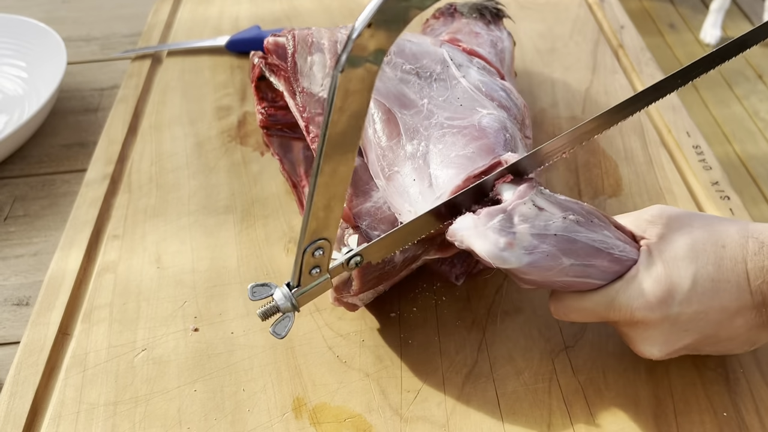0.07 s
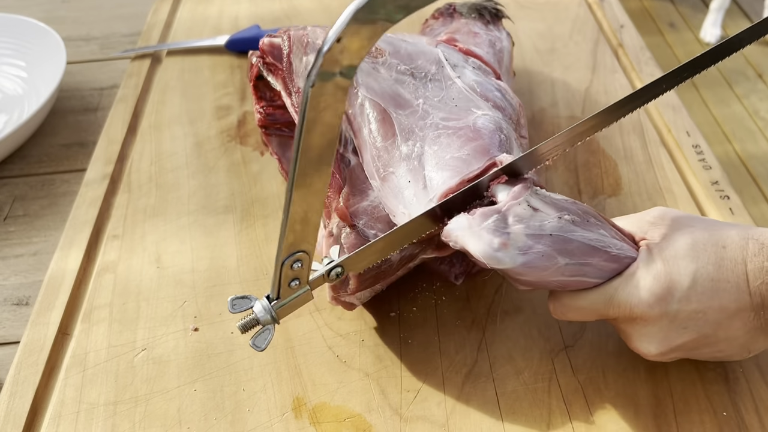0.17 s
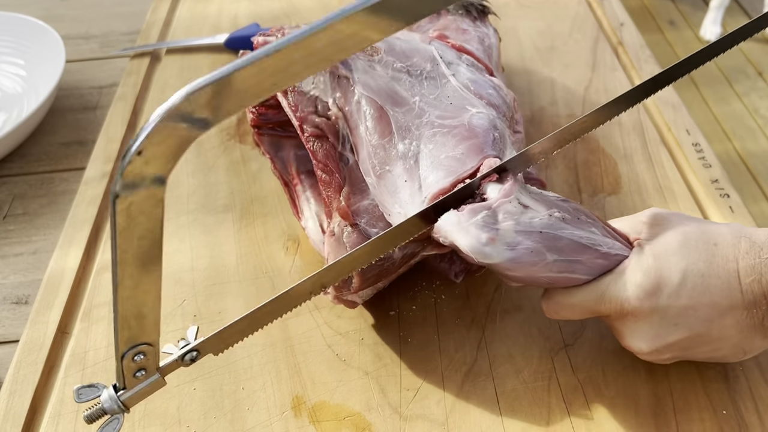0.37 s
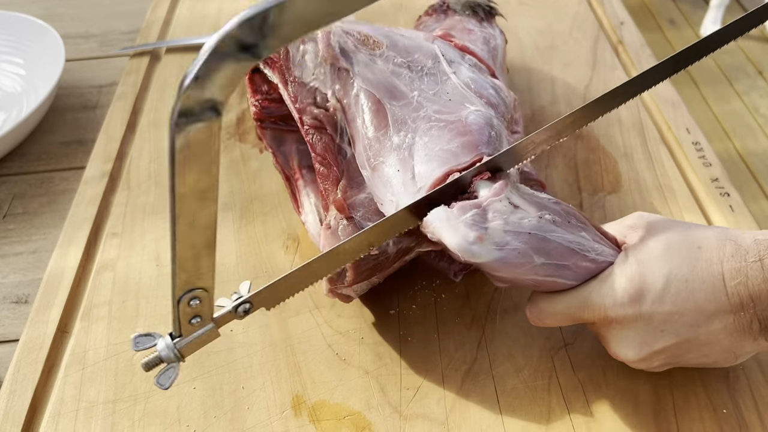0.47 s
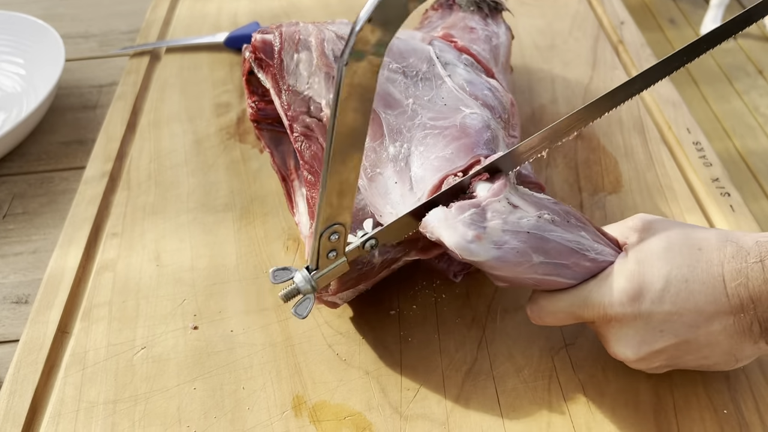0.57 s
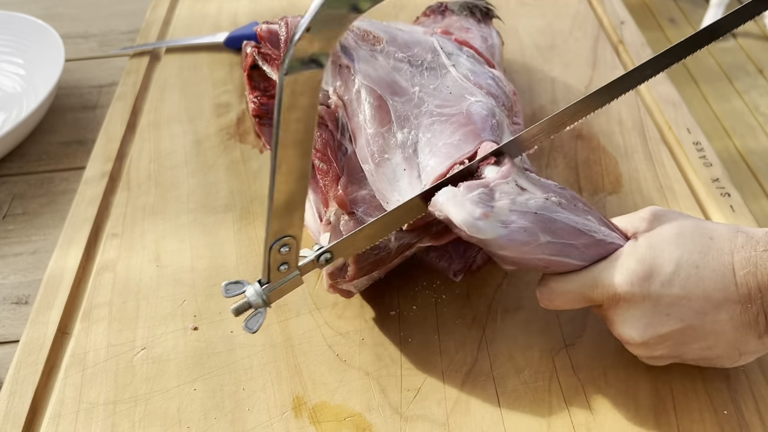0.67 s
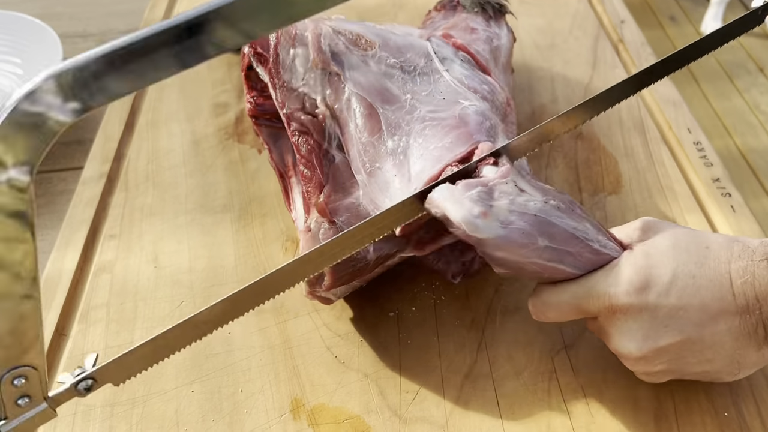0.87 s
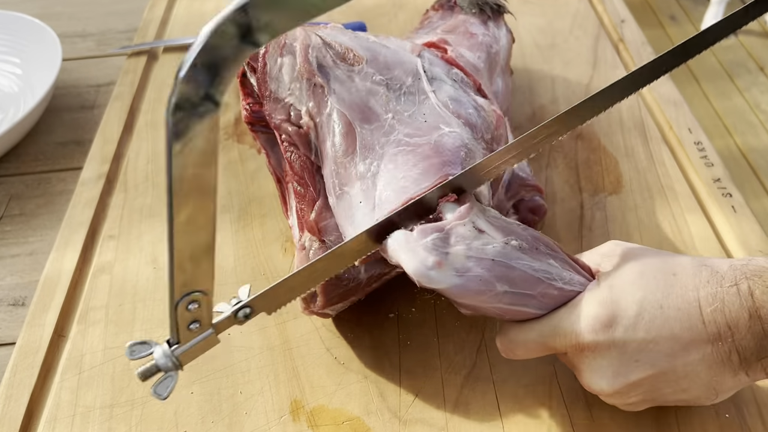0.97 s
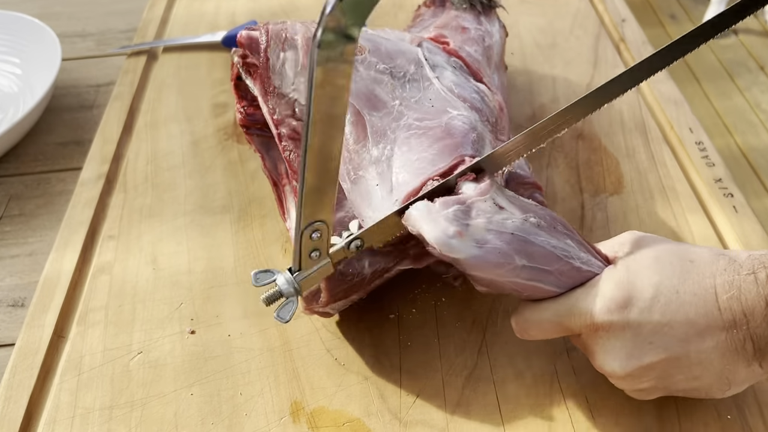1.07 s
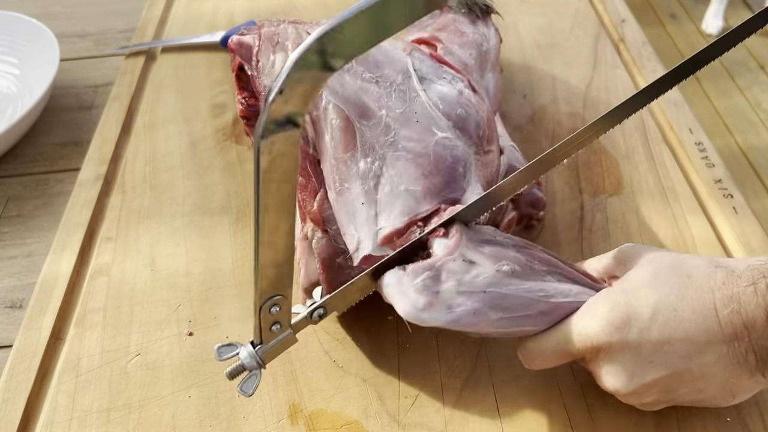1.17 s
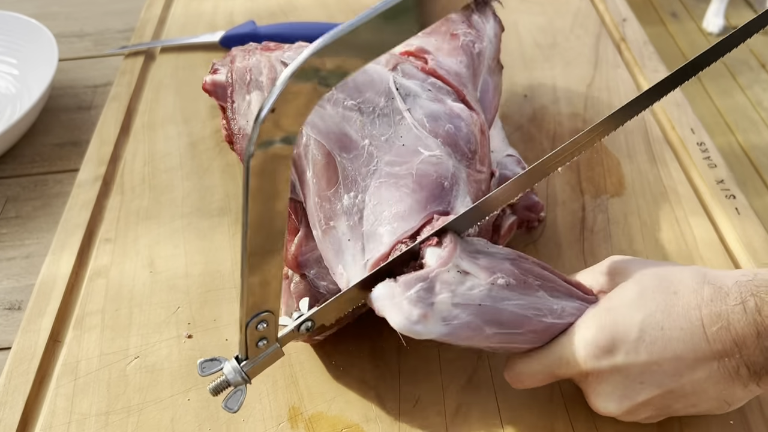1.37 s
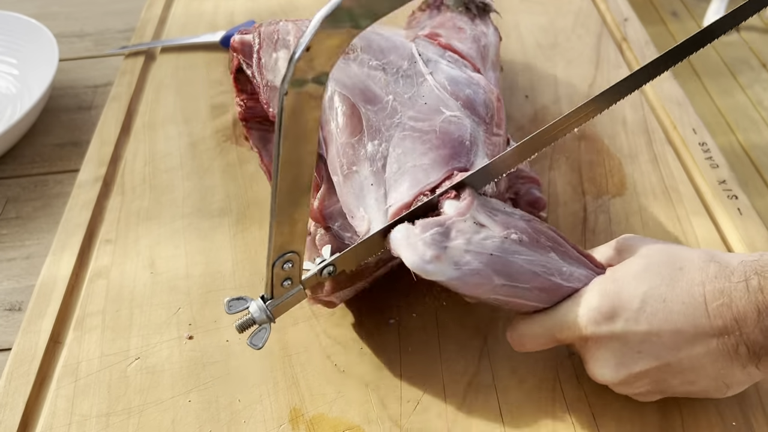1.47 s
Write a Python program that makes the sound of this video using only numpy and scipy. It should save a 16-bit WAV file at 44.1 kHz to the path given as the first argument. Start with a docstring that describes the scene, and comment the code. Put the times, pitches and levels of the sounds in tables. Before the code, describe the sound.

A hand saw cuts through meat and bone on a wooden board, close by in quiet open air. Four uneven rasping strokes with small clicks and brief squeaks lead to a weaker last drag that dies away.

```python
"""Over a quiet outdoor bed, a hand saw bites into a joint of meat and bone on a wooden board.
Each tooth catches and breaks off a burst of chips, which knock bone and board and ring the steel.
Four rasping strokes follow one another; here and there a tooth snags with a click or the blade binds
and squeals, and a short ring trails each stroke. A brief last drag dies away and the saw comes to rest."""
import sys
import numpy as np
from scipy import signal
from scipy.fft import rfft, irfft
from scipy.io import wavfile
from scipy.ndimage import uniform_filter1d

SR = 44100
rng = np.random.default_rng(int(sys.argv[2]) if len(sys.argv) > 2 else 0)


def persist_wave(psi):
    """Save psi, clipped to +-1, as 16-bit WAV."""
    counts = np.round(np.clip(psi, -1, 1) * 32767).astype(np.int16)
    wavfile.write(sys.argv[1], SR, np.atleast_2d(counts).T)


N = 66150
TIME_S = np.arange(N) / SR


def undb(db):
    """Decibels to gain."""
    return 10 ** (np.asarray(db) / 20)


def unit(x):
    """Scale to rms 1."""
    return x / np.sqrt(np.mean(x ** 2))


def curve(rows, column=1):
    """One column of a table, joined by straight lines in time."""
    rows = np.array(rows, float)
    return np.interp(TIME_S, rows[:, 0], rows[:, column])


def wander(per_s):
    """A random drift with a spread near 1."""
    return 1.2 * np.interp(TIME_S * per_s, np.arange(256), rng.standard_normal(256))


def colour(x, points, size=1024):
    """Minimum-phase EQ of unit power through (freq_hz, level_db) points."""
    hz, db = np.array(points, float).T
    freqs = np.maximum(np.fft.rfftfreq(size, 1 / SR), 1)
    cepstrum = irfft(np.log(undb(np.interp(np.log(freqs), np.log(hz), db))))
    cepstrum[1:size // 2] *= 2
    cepstrum[size // 2 + 1:] = 0
    impulse = irfft(np.exp(rfft(cepstrum)))
    return signal.fftconvolve(x, impulse / np.linalg.norm(impulse))[:N]


def ring(x, modes):
    """Excite a bank of decaying modes, with unit power in all."""
    t = np.arange(N // 2) / SR
    impulse = np.zeros(len(t))
    for k, (hz, db, t60_s) in enumerate(modes):
        decay = undb(db) / np.sqrt(t60_s) * np.exp(-np.log(1000) * t / t60_s)
        impulse += (-1) ** k * decay * np.sin(2 * np.pi * hz * t)
    return signal.fftconvolve(x, impulse / np.linalg.norm(impulse))[:N]


def resonance(x, hz, width_hz):
    """Two passes through one band-pass, scaled to rms 1."""
    b, a = signal.iirpeak(hz, hz / width_hz, fs=SR)
    return unit(signal.lfilter(b, a, signal.lfilter(b, a, x)))


def tail(x, db, t60_s):
    """Add a short diffuse decay."""
    t = np.arange(N // 2) / SR
    impulse = rng.standard_normal(len(t)) * np.exp(-np.log(1000) * t / t60_s)
    return x + undb(db) * signal.fftconvolve(x, impulse / np.linalg.norm(impulse))[:N]


def outdoors(level_db=-66.5):
    """A bed of faint rumble and distant hiss."""
    # tone of the open air: freq_hz, level_db
    air_eq = [(12, -35), (20, -1), (66, 3.5), (126, -14.5), (253, -6), (299, -15), (384, -15.5),
              (963, -13.5), (1080, -11.5), (1270, -17.5), (2220, -26), (2700, -35), (15600, -37.5)]
    return undb(level_db) * unit(colour(rng.standard_normal(N), air_eq, size=4096))


def teeth(jitter_periods=0.033, spread_db=1.53, rub=0.2, fade_periods=0.89):
    """Each tooth catches, then eases off over a steady rub; returns its phase (0 to 1) and force."""
    # teeth passing the bone: time_s, rate_hz
    tooth_rate = [(.1, 151.7), (.24, 190.9), (.30, 175.8), (.35, 210.8), (.44, 120.9), (.52, 205.5),
                  (.56, 281), (.63, 165), (.69, 183.3), (.78, 195.9), (.88, 149.1), (.945, 221.9),
                  (1.02, 143.3), (1.14, 165)]
    timing, strength = rng.standard_normal((1024, 2)).T
    travel = np.cumsum(curve(tooth_rate)) / SR
    index = np.arange(len(timing))
    passed = np.interp(travel, index + jitter_periods * timing, index)
    phase = passed % 1
    catch = rub + np.exp(-phase / fade_periods)
    return phase, undb(spread_db * strength[passed.astype(int)]) * catch


def chips(force, per_s=20000, spread_db=0.8):
    """Tiny fractures of uneven size, strongest as a tooth catches."""
    breaks = rng.random(N) < per_s / SR
    size = undb(spread_db * np.minimum(rng.exponential(size=N), 5))
    return unit(breaks * size * np.sign(rng.standard_normal(N)) * force)


def slide(x, depth_db=4.5, per_s=45, spacing_hz=330, bands=48):
    """Narrow bands swell and sink on their own as the blade's free length changes."""
    spectrum, out = rfft(x), np.zeros(N)
    position = np.minimum(np.fft.rfftfreq(N, 1 / SR) / spacing_hz, bands - 1)
    for k in range(bands):
        band = irfft(spectrum * np.maximum(1 - np.abs(position - k), 0), N)
        out += undb(depth_db * wander(per_s)) * band
    return unit(out)


def snags(gain_db=-31, fade_s=0.0014):
    """Short cracks where a tooth sticks and breaks free."""
    # snagging teeth: start_s, relative_db
    catches = [(0.144, -21.5), (.195, -15), (0.219, -20), (.483, -10), (0.5161, 1.5), (0.561, -11),
               (0.648, -12), (0.772, -15), (0.8937, -11.5), (1.023, -6), (1.227, -27.5), (1.286, -31.5)]
    envelope = np.zeros(N)
    for start_s, db in catches:
        envelope += undb(db + gain_db) * (TIME_S >= start_s) * np.exp(-np.abs(TIME_S - start_s) / fade_s)
    return envelope * rng.standard_normal(N)


def squeals(width_hz=200):
    """Rough narrow tones that swell and fade as the blade binds."""
    # chatter and squeal of the blade: centre_s, length_s, pitch_hz, level_db
    binds = [(0.142, 0.092, 1680, -65.5), (0.147, 0.0055, 4910, -55.5), (0.193, 0.003, 4870, -49),
             (0.332, 0.031, 3300, -47.5), (0.342, .008, 3750, -37), (0.357, .008, 3705, -41.5),
             (0.691, 0.015, 370, -45.5), (0.714, 0.0087, 986, -39), (0.759, 0.026, 3754, -36.5),
             (0.761, 0.02, 4955, -39), (.964, 0.014, 1508, -38.5), (0.967, 0.025, 3600, -40.5),
             (0.995, 0.042, 3757, -44), (1.019, 0.0054, 4850, -39), (1.07, 0.029, 2080, -55),
             (1.119, 0.035, 1917, -52.5)]
    out = np.zeros(N)
    for centre_s, length_s, hz, db in binds:
        tone = signal.hilbert(resonance(rng.standard_normal(N), hz, width_hz))
        compressed = unit(tone.real / np.sqrt(np.abs(tone)))
        swell = np.exp(-2 * ((TIME_S - centre_s) / length_s) ** 2)
        out += undb(db) * swell * compressed
    return out


def scrape_and_board(force, drive, scrape_db=-7.5, board_db=-10):
    """Chips make a low scrape and knock the wooden board into ringing."""
    # tone of the scrape: freq_hz, level_db
    scrape_eq = [(80, -62), (170, -11), (270, -9.5), (400, -2.5), (600, -2), (1000, 0.5), (1650, -1),
                 (2100, -9.5), (3000, -9.5), (6000, -52)]
    # modes of the board: pitch_hz, relative_db, t60_s
    board_modes = [(172.6, -8.5, 0.089), (372, -4, .05), (437, -0.5, 0.069), (594, -5, 0.19),
                   (683, -8.5, 0.061), (912, 2, 0.037), (1179, -10.5, 0.1), (1345, -12, 0.0928),
                   (1595, -2.5, 0.17), (1686, -6.5, 0.0504)]
    scrape = undb(scrape_db) * colour(drive * chips(force), scrape_eq)
    return scrape + undb(board_db) * ring(drive * chips(force), board_modes)


def bone(grit, phase, hum_gain_db=-2.5, waver_db=3):
    """Chips excite two bone resonances, new for each stroke; the teeth add a wavering hum."""
    # the bone's voice per stroke, levels relative: start_s, main_hz, half_width_hz, main_db,
    # second_hz, second_db, hum_db (at the tooth rate), octave_db (at twice that rate)
    strokes = [(0, 1075, 240, -2.5, 436, -10.5, -11.5, -17.5),
               (0.439, 1390, 400, -7, 596, -13, -17.5, -14.5),
               (.63, 1021, 110, -0.5, 1558, -6.5, -23.5, -13.5),
               (.88, 1496, 127, -9.5, 783, -12.5, -14.5, -17), (1.09, 954, 400, -7, 633, -13, -18.5, -22.5)]
    ends = [row[0] for row in strokes[1:]] + [N / SR]
    hum_gain = np.sqrt(2) * undb(hum_gain_db + waver_db * wander(per_s=130))
    out = np.zeros(N)
    for stroke, end_s in zip(strokes, ends):
        start_s, main_hz, half_width_hz, main_db, second_hz, second_db, hum_db, octave_db = stroke
        gate = uniform_filter1d(1. * ((TIME_S >= start_s) & (TIME_S < end_s)), size=400)
        hum = undb(hum_db) * np.sin(2 * np.pi * phase) + undb(octave_db) * np.sin(4 * np.pi * phase)
        knock = undb(main_db) * resonance(grit, main_hz, 2 * half_width_hz)
        knock += undb(second_db) * resonance(grit, second_hz, width_hz=180)
        out += gate * (knock + hum_gain * hum)
    return out


def steel(excitation, gain_db=-7):
    """Chips and snags ring the blade and frame."""
    # modes of the steel: pitch_hz, relative_db, t60_s
    steel_modes = [(2780, -17, .16), (3275, -13, .12), (3680, -3, .04), (3765, -4, .16), (3840, -6, .05),
                   (4114, -8, .05), (4450, -5, .04), (4580, -6, .08), (4815, -3, .06), (4938, -4, .07),
                   (5022, -3, .07), (5371, -6, .06), (6580, -11, .05), (8400, -12, .015)]
    return undb(gain_db) * ring(excitation, steel_modes)


def rasp(coarse, fine, rasp_db=-2.5, hiss_db=-0.5):
    """The bright rasp of the cut, topped by the hiss of the finest chips."""
    # tone of the rasp: freq_hz, level_db
    rasp_eq = [(800, -23.5), (2000, -9), (3050, -7.5), (3700, 2), (5000, 2), (6000, -2), (8300, -5.5),
               (9800, -12.5), (12000, -41)]
    # tone of the hiss: freq_hz, level_db
    hiss_eq = [(6000, -39.5), (9500, -7), (11200, 1), (12400, 0), (14000, -3.5), (16000, -4.5)]
    return undb(rasp_db) * colour(coarse, rasp_eq) + undb(hiss_db) * colour(fine, hiss_eq)


def saw(stop_s=1.39, stop_db_per_s=113):
    """One row of teeth drives the low body of bone and board and the bright edge of rasp and steel."""
    # depth of bite, rows grouped by stroke, levels relative: time_s, rasp_db, scrape_db, hiss_db
    stroke_bites = [
        [(0.0, -95, -82, -100), (0.05, -93, -85, -102), (0.112, -87, -66.5, -100), (0.14, -71, -60.5, -80),
         (0.2, -51, -53.5, -68), (0.21, -63, -58, -68), (0.232, -48, -45, -56.5), (0.276, -43, -40.5, -56.5),
         (0.344, -38, -40.5, -57), (0.376, -78, -54.5, -76), (0.412, -80, -61, -92), (0.44, -73, -61, -78)],
        [(0.44, -62, -70, -72), (0.454, -65.5, -61, -78), (0.482, -41, -48.5, -53), (0.494, -47.5, -44, -60),
         (0.504, -47.5, -54.5, -54), (0.518, -46, -37.5, -36.5), (0.53, -49.5, -41.5, -54),
         (0.566, -50, -47, -58), (0.63, -80, -59.5, -85)],
        [(0.63, -70, -58, -79), (0.662, -38, -42, -52), (0.708, -36, -38, -45.5), (0.722, -43, -44, -45.5),
         (0.738, -37.5, -39.5, -50), (0.76, -32.5, -40.5, -40.5), (0.772, -27.5, -37, -37.5),
         (0.782, -40.5, -43, -50), (0.792, -56, -49, -54.5), (0.816, -65, -60, -65.5), (0.88, -67, -71, -95)],
        [(0.88, -71.5, -64.5, -81), (0.932, -41, -44.5, -46.5), (0.94, -39, -43.5, -44),
         (0.96, -36.5, -33, -51.5), (0.99, -48.5, -41, -53), (1.002, -41.5, -39, -53), (1.064, -50, -44, -60.5),
         (1.086, -75, -57, -72), (1.122, -53.5, -41.5, -75), (1.142, -50.5, -49.5, -55.5),
         (1.17, -85, -52, -92), (1.3, -79.5, -75.5, -90)],
    ]
    bite = [row for stroke in stroke_bites for row in stroke]
    fade_db = stop_db_per_s * np.maximum(TIME_S - stop_s, 0)
    rasp_drive, scrape_drive, hiss_drive = (undb(curve(bite, column) - fade_db) for column in (1, 2, 3))
    phase, force = teeth()
    grit = chips(force)
    cut = slide(chips(force))
    cracks = snags()
    body = scrape_and_board(force, scrape_drive) + scrape_drive * bone(grit, phase)
    edge = rasp(coarse=rasp_drive * cut + cracks, fine=hiss_drive * cut + cracks / 2)
    edge += steel(rasp_drive * slide(chips(force)) + cracks) + squeals()
    return tail(body, db=-10.5, t60_s=0.29) + tail(edge, db=-14, t60_s=0.22)


def scene():
    """The saw close by in the open air, in mono."""
    return (saw() + outdoors())[None]


def record(dry, cutoff_hz=15800):
    """A steep low-pass trims the very top."""
    return signal.sosfilt(signal.ellip(12, .2, 80, cutoff_hz, fs=SR, output="sos"), dry)


dry = scene()
out = record(dry)
persist_wave(out)
```